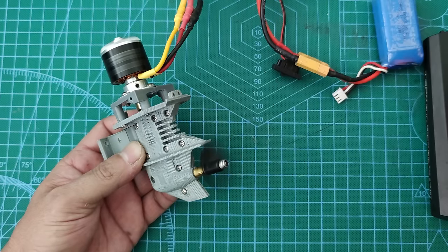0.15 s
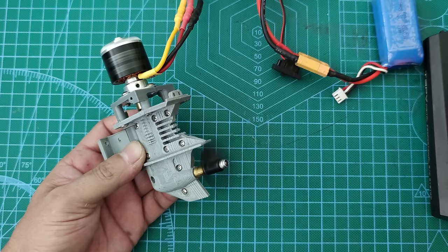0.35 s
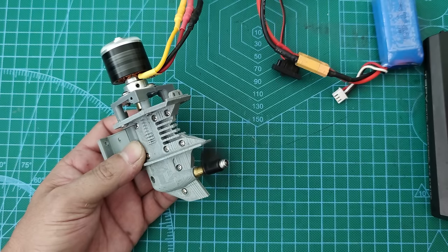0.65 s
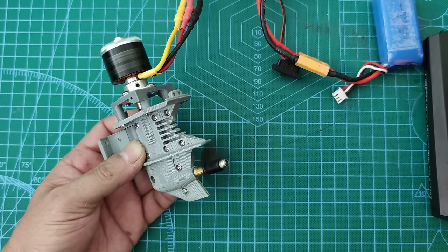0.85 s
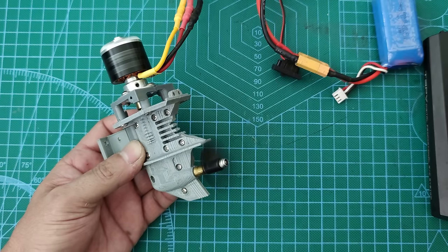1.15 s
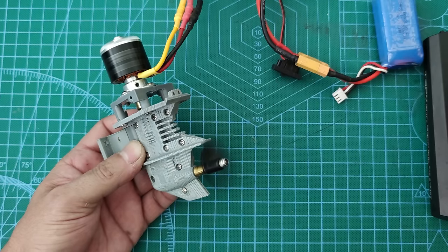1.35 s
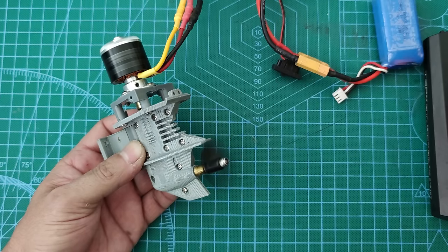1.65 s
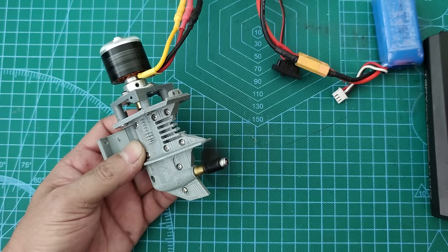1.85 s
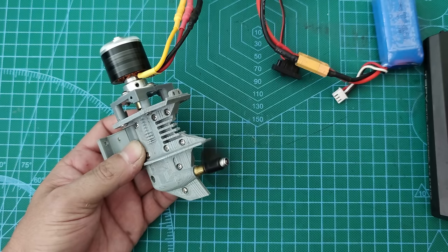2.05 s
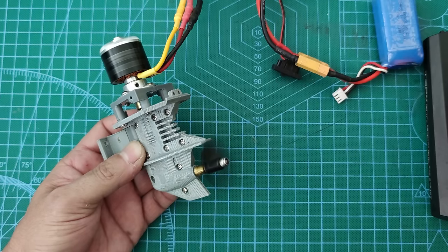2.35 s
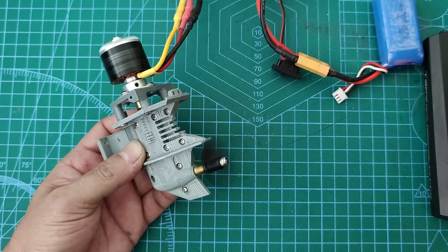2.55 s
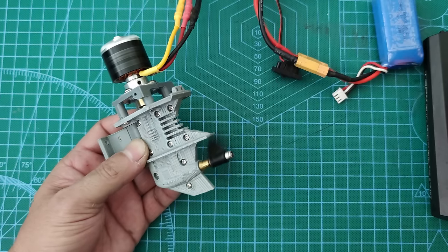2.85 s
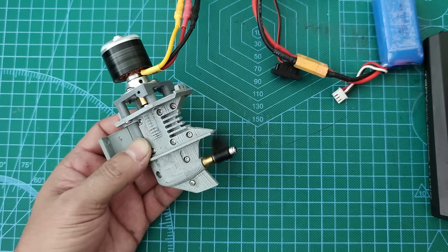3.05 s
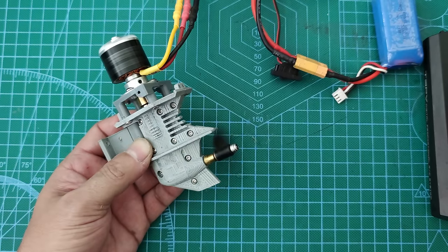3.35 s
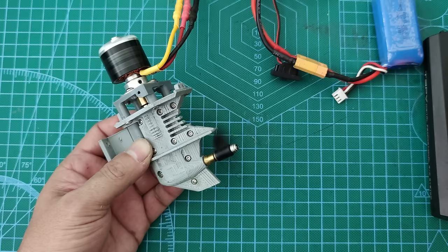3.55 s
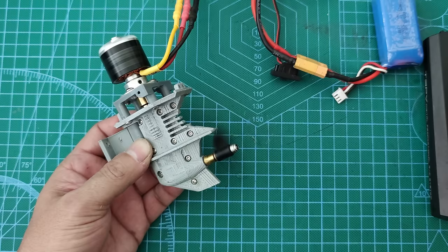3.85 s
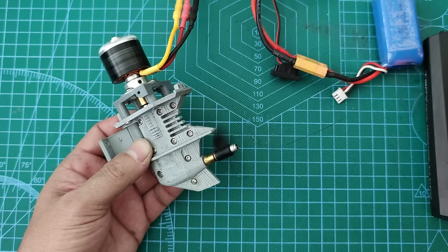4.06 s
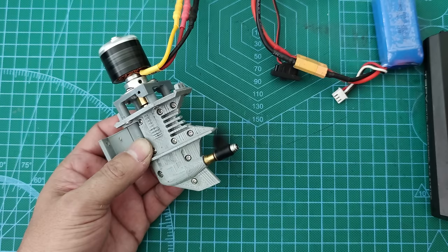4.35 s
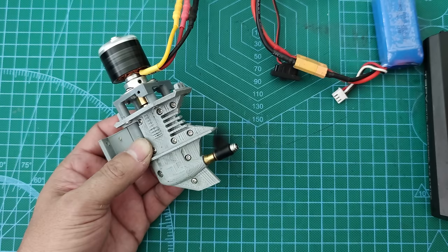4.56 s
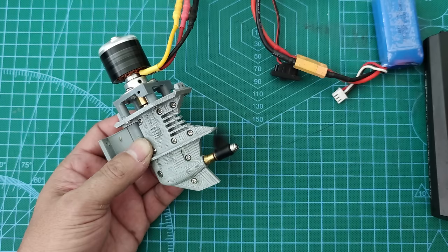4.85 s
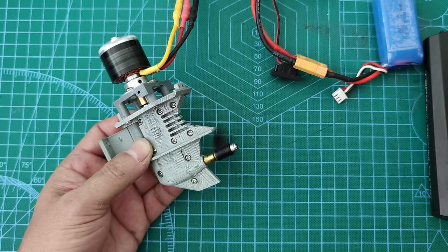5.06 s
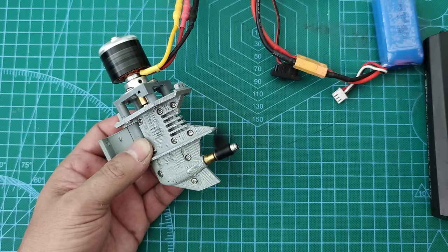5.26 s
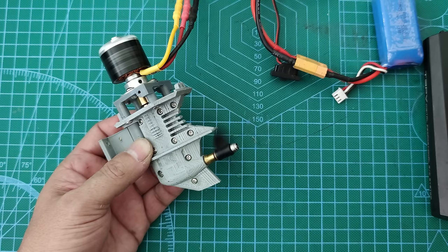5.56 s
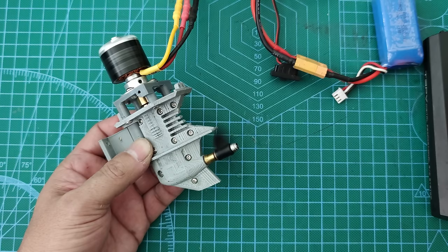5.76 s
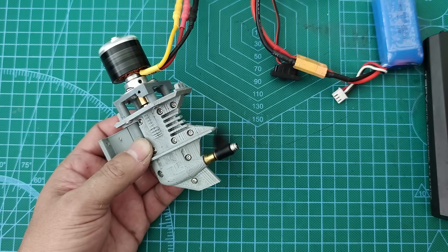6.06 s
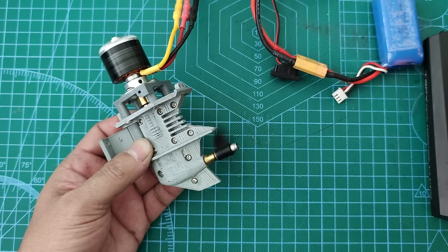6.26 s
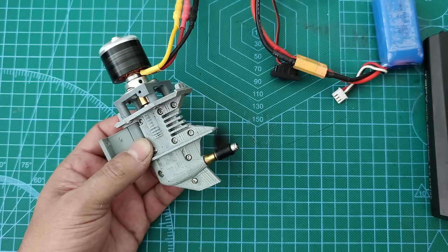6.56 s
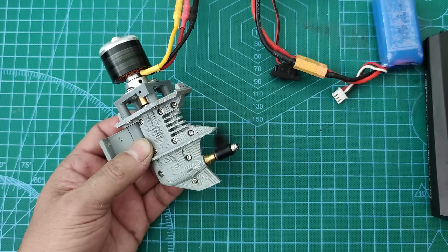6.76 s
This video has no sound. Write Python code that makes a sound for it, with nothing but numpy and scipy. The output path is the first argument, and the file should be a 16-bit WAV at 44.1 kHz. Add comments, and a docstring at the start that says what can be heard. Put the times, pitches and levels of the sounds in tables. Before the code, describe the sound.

A small electric motor drives a plastic gearbox held in the hand over a workbench, heard very close in a quiet small room. It idles as a faint low buzz with soft finger rubs, then climbs in steps, whining higher and rattling harder, until it holds a loud, bright, gritty whine to the end without stopping.

```python
"""Hand-held gearmotor revving up

A small brushless motor drives a plastic gearbox held in one hand above a bench mat, close to a phone.
It idles, speeds up in steps and holds full speed. Shaft orders whine as sines locked to the turning angle;
gears rattle as noise that throbs with each turn. Both shake the housing, whose modes colour them.
Rotor hiss, a faint switching tone and finger rubs join in, with bench reflections and a humming quiet room."""
import sys
import numpy as np
from scipy import signal
from scipy.fft import rfft, irfft, next_fast_len
from scipy.io import wavfile
from scipy.ndimage import uniform_filter1d

SR = 44100
rng = np.random.default_rng(int(sys.argv[2]) if len(sys.argv) > 2 else 0)


def wrap_up_sound(samples):
    """Save the sound to the file named by the first command line argument, as 16-bit audio."""
    columns = np.atleast_2d(samples).T
    # keep every value between -1 and 1, then stretch to whole-number steps
    tamed = np.clip(columns, -1, 1)
    steps = np.round(tamed * 32767).astype(np.int16)
    wavfile.write(sys.argv[1], SR, steps)


N = 304290

# Shaft speed through idle, three pushes of the throttle and full speed: (time [s], speed [turns/s])
SHAFT_SPEED = [(0, 56.1), (.29, 56.8), (1.21, 57.5), (1.29, 60.4), (1.48, 78.3), (1.71, 96.7),
               (1.98, 108.6), (2.17, 115.6), (2.32, 122.8), (2.46, 127.9), (2.67, 133.8), (2.9, 143.9),
               (3.04, 156.6), (3.44, 197.7), (3.84, 232.8), (4, 240.6), (4.21, 245.3), (4.3, 251.7),
               (4.4, 256.1), (4.57, 259), (4.71, 266.2), (4.82, 276.1), (5, 289.1), (5.09, 301.6),
               (5.17, 308.1), (5.23, 310.8), (5.38, 315.1), (5.57, 317.3), (6.67, 321.2), (6.9, 321.4)]
FULL_SPEED = 320  # turns/s
# Force on the housing: (time [s], gear rattle level [dB], whine level [dB])
HOUSING_FORCE = [(0, -35, -36.5), (.12, -39, -40.5), (.25, -36.5, -38.5), (1.25, -37.5, -39.5),
                 (1.77, -27.5, -34), (1.85, -30.5, -37.5), (2.09, -26, -31.5), (2.2, -26, -32),
                 (2.75, -25.5, -32), (3.3, -18.5, -29), (3.75, -16.5, -24), (3.85, -14.5, -22),
                 (4.25, -13, -22), (4.55, -12.5, -21.5), (4.62, -15, -21.5), (5.2, -14, -23.5),
                 (5.6, -14.5, -22), (6.9, -14, -21.5)]

# Relative strength of shaft orders 2, 3, 4 .. 50: (level [dB])
ORDER_LEVELS = [-9.5, -5, -12, -8, -9.5, -6.5, -10, -7.5, -8, -7, -4.5, -8, -9, -1, -3.5, -1, -4, -11, -6.5,
                -6.5, -16.5, -7.5, -5, -20, -9.5, -21, -17, -8.5, -10, -17, -5.5, -13, -11, -6.5, -11, -7,
                -28, -11, -6, -24, -24, -5, -30, -21, -9, -21, -12, -33, -14]
# Single orders ring out or drop back for a while: (order, s = start [s], length [s], db = change [dB])
ORDER_SWELLS = [dict(order=7, s=-0.15, length=2, db=8), dict(order=7, s=1.57, length=0.52, db=7.5),
                dict(order=16, s=1.39, length=.55, db=9), dict(order=48, s=1.49, length=0.73, db=8),
                dict(order=50, s=1.93, length=.22, db=16), dict(order=47, s=2.3, length=.1, db=20),
                dict(order=17, s=-.3, length=1.7, db=-7), dict(order=11, s=5.5, length=2.7, db=-3),
                dict(order=3, s=2.6, length=0.48, db=4), dict(order=48, s=2.86, length=0.16, db=17),
                dict(order=33, s=3.18, length=.1, db=13), dict(order=2, s=3.08, length=1.8, db=6.5),
                dict(order=7, s=3.25, length=0.62, db=7), dict(order=4, s=3.62, length=0.4, db=8),
                dict(order=7, s=4., length=0.63, db=-7), dict(order=6, s=4.1, length=0.6, db=6.5),
                dict(order=8, s=4.13, length=0.52, db=7.5), dict(order=5, s=4.5, length=0.48, db=5.5),
                dict(order=4, s=4.5, length=0.67, db=7), dict(order=2, s=4.6, length=0.63, db=-8.5),
                dict(order=4, s=5.3, length=3.1, db=-6), dict(order=7, s=5.1, length=2.5, db=-5),
                dict(order=13, s=4.7, length=2.5, db=-25), dict(order=15, s=4.9, length=2.2, db=2.5),
                dict(order=29, s=5., length=1.7, db=2)]
WHINE_BRIGHT_DB = 0.5  # dB per octave of order about order 16, for each octave of speed

# How the rattle swells within one turn: (swells per turn, share of the throb [0-1])
TURN_THROB = [(1, 0.87), (2, 0.36), (3, 0.55), (5, 0.27), (8, 0.39)]
THROB_DB = 4.0  # dB for a share of 1
# Rattle slope at full speed [dB/octave of pitch], and its loss for each octave of speed below that
BRIGHT_DB, DULLING_DB = 1.36, 1.83

# The gear pair binds in a slow beat: (time [s], rate [beats/s], depth of the beat's fundamental [dB])
GEAR_JUDDER = [(0, 11, .2), (1.3, 10, .4), (3, 22, 0.55), (3.85, 23, 0.86), (4.1, 22, .5), (4.6, 22, 0.56),
               (5.3, 17, 0.5), (6.9, 16.8, 0.48)]
WHINE_EXTRA_JUDDER = 1.2  # added to the judder that whine and rattle share
# Slow even swelling of the rattle below half speed: period [s], time of one crest [s], depth [dB]
HUNT_S, HUNT_CREST_S, HUNT_DB = 0.358, 0.26, 0.74

# Sound radiated by the housing between its modes: (frequency [Hz], level [dB])
HOUSING_RADIATION = [(100, -16), (400, -31.5), (1000, -20), (2100, -14), (4000, -8.5), (6000, -4),
                     (9200, -4), (10300, -18), (12500, -13), (14000, -31), (15000, -19.5), (16000, -28)]
# Modes of the plastic shell: (frequency [Hz], width at half amplitude [Hz], peak level of the mode alone [dB])
HOUSING_MODES = [(408, 53, -20.5), (632, 182, -19), (895, 88, -23), (1571, 240, -12), (1926, 130, -15.5),
                 (2528, 250, -8.5), (3460, 460, -4), (5125, 1240, -4), (5730, 900, -9.5), (6770, 63, -3),
                 (8364, 1160, 2), (8680, 400, -6.5), (11030, 520, -19)]

# The controller's switching tone: (time [s], peak level [dB])
SWITCHING_LEVEL = [(0, -90), (1.4, -70), (1.7, -59), (2.2, -59), (2.6, -75), (6.9, -90)]
CARRIER_HZ = 17330  # the tone sounds 21 shaft orders below this

# Fingers shift on the housing: (start [s], length [s], level [dB])
FINGER_SCUFFS = [(0.264, 0.23, -45.5), (0.606, 0.12, -37.5), (1.335, 0.09, -45)]
# Colour of skin on plastic: (frequency [Hz], relative level [dB])
SCUFF_COLOUR = [(88, -42), (150, -7), (540, -3), (597, -6), (1100, -1), (1440, -3.5), (3260, -2.5),
                (3540, -4.5), (8000, -13.5), (10400, -46), (17600, -120)]

# Level of left minus right at the two ports; the left rings near 9 kHz: (frequency [Hz], difference [dB])
PORT_TILT = [(60, -1), (2000, 0.5), (4800, 1.5), (5700, -8), (6500, 1.5), (7600, -5), (8400, 11), (9100, 7),
             (9800, 7.5), (10200, 9.5), (11400, 3.5), (12300, 0), (16000, -2)]
# Phase by which left leads: (frequency [Hz], while speeding up [rad], after the hand turned the housing [rad])
PORT_LEAD = [(20, -0.5, 0.5), (980, 1.6, -1.17), (1994, 1.59, 1.6), (2490, 3.5, 3.5), (2740, 5.5, 5.5),
             (3180, 4.5, 4), (3700, 4, 4.5), (4340, 3.5, 1.5), (4840, 4.5, 2.5), (5070, 3.5, 1.02),
             (5584, 4.5, 3), (6330, 5.5, 8), (7560, 4.5, 2), (7500, 7, 5), (8280, 9, 6.5), (10740, 23, 24),
             (16200, 37, 39)]
# The hand turns the housing a little: (time [s], how far it has turned [0-1])
HAND_TURN = [(0, 0), (4.6, 0), (5.1, 1), (6.9, 1)]

# Colour of the room's rumble: (frequency [Hz], relative level [dB])
ROOM_AIR = [(12, -29), (20, 9.5), (52, -6.5), (78, -7), (129, -39), (193, -12), (351, -7.5), (395, -16.5),
            (478, -13.5), (828, -18), (1180, -28.5), (1580, -8), (2150, -29), (3470, -14.5), (4840, -19.5),
            (6000, -27), (7800, -53), (13200, -120)]
ROOM_AIR_DB = -48.5  # before the room's left-right offset
# Steady hums, before the same offset: (frequency [Hz], level [dB], rate of wander [steps/s])
ROOM_HUMS = [(36.5, -53.5, 6.6), (193, -62, 3.5)]
EDGE_HZ = 15730  # upper band limit


def motor():
    """Shaft orders and gear rattle shake the housing; rotor air and switching join; one row for each port."""
    speed, = curves(SHAFT_SPEED)
    angle = 2 * np.pi * np.cumsum(speed) / SR
    octaves = np.log2(speed / FULL_SPEED)
    rattle_db, whine_db = curves(HOUSING_FORCE)
    judder_db = gear_judder()
    rattle_gain = gain_of(rattle_db + hunting(octaves))
    whine_gain = gain_of(whine_db + WHINE_EXTRA_JUDDER * judder_db)
    rattle = rattle_gain * gear_rattle(angle, octaves)
    whine = whine_gain * shaft_whine(angle, *order_strengths(octaves))
    shell = coloured((rattle + whine) * gain_of(judder_db), housing)
    return shell + rotor_air(octaves) + switching_tone(angle)


def gear_rattle(angle, octaves):
    """Tooth contact as noise, throbbing with the shaft angle, uneven from knock to knock and duller when slow."""
    throb = sum(share * np.cos(k * angle + rng.uniform(0, 2 * np.pi)) for k, share in TURN_THROB)
    fast_knocks_db = 1.43 * drift(count=1, per_s=570)[0]
    slow_knocks_db = 0.79 * drift(count=1, per_s=60)[0]
    envelope = gain_of(THROB_DB * throb + fast_knocks_db + slow_knocks_db)
    envelope /= np.sqrt(uniform_filter1d(envelope ** 2, size=4000))  # level evened over about 90 ms
    # each port faces another side of the housing, so part of the rattle differs
    shared, *own = rng.standard_normal((3, N))
    rattle = envelope * evened(shared + 0.8 * np.array(own))
    return tilted(rattle, BRIGHT_DB + DULLING_DB * octaves)


def shaft_whine(angle, numbers, gains):
    """Multiples of the shaft speed; each wavers in strength and phase as the load on the teeth shifts."""
    waver = drift(count=11, per_s=16)
    start = rng.uniform(0, 2 * np.pi, len(numbers))
    sway = gain_of(0.8 * waver[:6])  # dB rms
    slip = 0.15 * waver[6:]  # rad rms
    whine = np.zeros(N)
    for i, (number, gain) in enumerate(zip(numbers, gains)):
        whine += gain * sway[i % 6] * np.cos(number * angle + start[i] + slip[i % 5])
    return whine


def order_strengths(octaves):
    """Gain of every shaft order in time: its strength, weaker high orders when slow, and its swells."""
    numbers = np.arange(len(ORDER_LEVELS)) + 2
    t = np.arange(0, N, 64) / SR  # coarse steps, joined by straight lines below
    brightness = WHINE_BRIGHT_DB * np.outer(np.log2(numbers / 16), octaves[::64])
    db = np.array(ORDER_LEVELS)[:, None] + brightness
    for swell in ORDER_SWELLS:
        arch = np.sin(np.pi * np.clip((t - swell["s"]) / swell["length"], 0, 1))
        db[swell["order"] - 2] += swell["db"] * np.sqrt(abs(arch))
    return numbers, [np.interp(np.arange(N) / SR, t, row) for row in gain_of(db)]


def gear_judder():
    """Level change in dB as the gears bind: harmonics make a short swell in every cycle of the beat."""
    beats_per_s, depth_db = curves(GEAR_JUDDER)
    beat = 2 * np.pi * np.cumsum(beats_per_s) / SR + 0.39 * drift(count=1, per_s=2.56)[0]
    return depth_db * (np.cos(beat) + 0.7 * np.cos(2 * beat) + 0.5 * np.cos(3 * beat))


def hunting(octaves):
    """Even level swells in dB that come in below half speed and reach full depth half an octave lower."""
    t = np.arange(N) / SR
    amount = np.clip(-2 * (octaves + 1), 0, 1)
    return HUNT_DB * amount * np.cos(2 * np.pi * (t - HUNT_CREST_S) / HUNT_S)


def housing(hz):
    """A broad radiation curve with the modes of the plastic shell standing out of it, summed as power."""
    modes = sum(gain_of(2 * db) / (1 + (2 * (hz - f) / width) ** 2) ** 2 for f, width, db in HOUSING_MODES)
    return np.sqrt(gain_of(2 * read(HOUSING_RADIATION, hz)) + modes)


def rotor_air(octaves):
    """Air stirred by the rotor: an even hiss in the top treble, growing with speed."""
    hiss = coloured(rng.standard_normal((2, N)), lambda hz: 1 / (1 + (11000 / (hz + 1)) ** 6))
    return hiss * gain_of(-27 + 13.3 * octaves)


def switching_tone(angle):
    """The controller's switching tone, which sinks in pitch as the shaft speeds up."""
    t = np.arange(N) / SR
    level_db, = curves(SWITCHING_LEVEL)
    return gain_of(level_db) * np.cos(2 * np.pi * CARRIER_HZ * t - 21 * angle)


def fingers():
    """Short soft rubs of skin on plastic: coloured noise with a quick onset and a slower fade."""
    t = np.arange(N) / SR
    shape = np.zeros(N)
    for start, length, db in FINGER_SCUFFS:
        onset = np.clip((t - start) / 0.0078, 0, 1)
        fade = np.clip((start + length - t) / length, 0, 1) ** 0.77
        shape += gain_of(db) * onset * fade
    skin = coloured(rng.standard_normal(N), lambda hz: gain_of(read(SCUFF_COLOUR, hz)))
    return shape * evened(skin)


def ports(hz):
    """Gain of the left and the right port, which share out their level difference."""
    return gain_of(np.outer([0.6, -0.4], read(PORT_TILT, hz)))


def room(x, t60=0.09):
    """Sparse taps of random sign, other ones at each port, dying away: the bench and things on it."""
    length, slot = SR // 4, 20
    taps = np.zeros((2, length))
    slots = np.arange(60, length - slot, slot)
    at = slots + rng.integers(0, slot, (2, len(slots)))  # one tap somewhere in each slot
    np.put_along_axis(taps, at, rng.choice([-1., 1.], at.shape), 1)
    taps *= gain_of(-60 * np.arange(length) / SR / t60)
    return signal.oaconvolve(x, taps / np.linalg.norm(taps[0]), axes=1)[:, :N]


def room_tone():
    """Low rumble as coloured noise, partly shared by both ports, with narrow hums as wandering sines."""
    shared, left, right = rng.standard_normal((3, N))
    noise = np.array([shared + 0.5 * left, 0.47 * shared + 0.5 * right])
    air = evened(coloured(noise, lambda hz: gain_of(read(ROOM_AIR, hz))))
    t = np.arange(N) / SR
    hum = np.zeros(N)
    for f, db, wander in ROOM_HUMS:
        level = np.sqrt(2) * gain_of(db + 1.2 * drift(count=1, per_s=wander)[0])
        hum += level * np.sin(2 * np.pi * f * t + 0.78 * drift(count=1, per_s=wander)[0])
    return (gain_of(ROOM_AIR_DB) * air + hum) * gain_of([[1.1], [-1.1]])  # left a little louder


def gain_of(db):
    """Amplitude factor of a level in dB."""
    return 10 ** (np.asarray(db) / 20)


def evened(x):
    """Scales each row to rms 1."""
    return x / np.sqrt(np.mean(x ** 2, axis=-1, keepdims=True) + 1e-20)


def curves(rows):
    """Columns of a table as functions of time, one value a sample."""
    s, *columns = np.transpose(rows)
    return [np.interp(np.arange(N) / SR, s, c) for c in columns]


def read(points, hz):
    """Reads a table at given frequencies, straight between points on a log frequency scale."""
    f, value = np.transpose(points)
    return np.interp(np.log(hz + 1), np.log(f + 1), value)


def coloured(x, response):
    """Filters by a response given as a function of frequency."""
    size = next_fast_len(N + 4096)
    return irfft(rfft(x, size) * response(np.fft.rfftfreq(size, 1 / SR)), size)[..., :N]


def drift(count, per_s):
    """Random curves of rms about 1, straight between per_s random values a second."""
    steps = int(N / SR * per_s) + 2
    at = np.arange(N) * (per_s / SR)
    values = rng.standard_normal((count, steps))
    return 1.22 * np.array([np.interp(at, np.arange(steps), row) for row in values])


def tilted(x, db_per_octave):
    """Turns the spectrum about 6 kHz by a slope that changes in time."""
    hz, frames, z = signal.stft(x, SR, nperseg=256)
    octaves = np.log2(np.clip(hz, 300, None) / 6000)[:, None]
    slope = np.interp(frames, np.arange(N) / SR, db_per_octave)
    return signal.istft(z * gain_of(octaves * slope), SR, nperseg=256)[1][..., :N]


def scene():
    """Motor and rubs reach both ports directly and by way of the bench, over the room tone."""
    near, rubs = motor(), fingers()
    # the right port's phase is shifted by the lead; it changes as the hand turns the housing
    f, *leads = np.transpose(PORT_LEAD)
    before, after = (coloured(near[1], lambda hz: np.exp(-1j * np.interp(hz, f, lead))) for lead in leads)
    turn, = curves(HAND_TURN)
    direct = np.array([near[0], (1 - turn) * before + turn * after])
    heard = direct + rubs + gain_of(-11) * room(near + rubs)
    return coloured(heard, ports) + room_tone()


def record(dry):
    """The highest peaks round off softly; then the band limit."""
    rounded = 1.3 * np.tanh(dry / 1.3)
    low_pass = signal.firwin(1023, EDGE_HZ, window=("kaiser", 8), fs=SR)
    return signal.oaconvolve(rounded, low_pass[None], "same")


dry = scene()
out = record(dry)
wrap_up_sound(out)
```